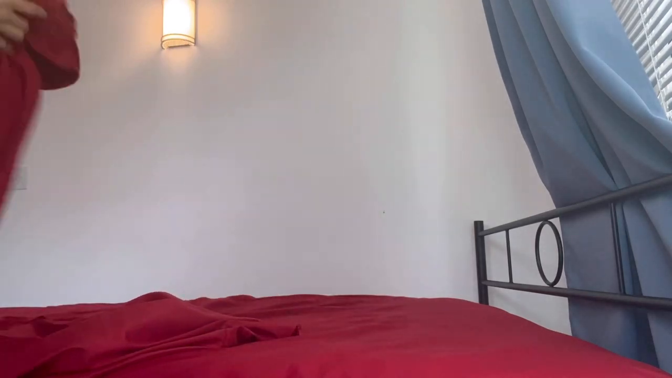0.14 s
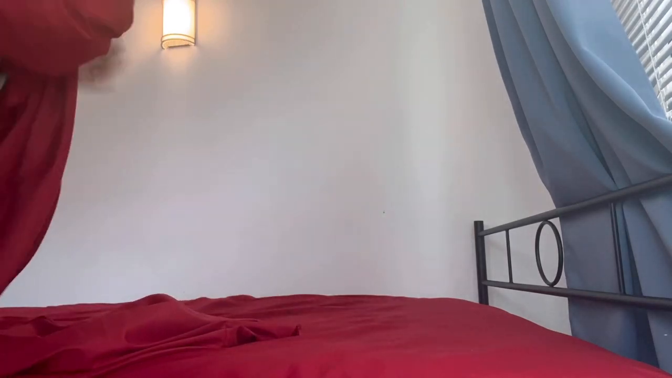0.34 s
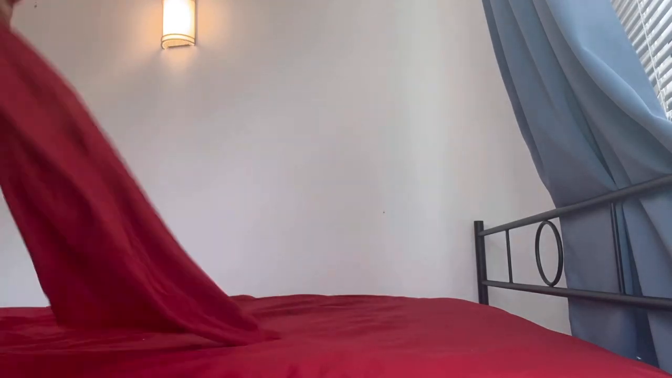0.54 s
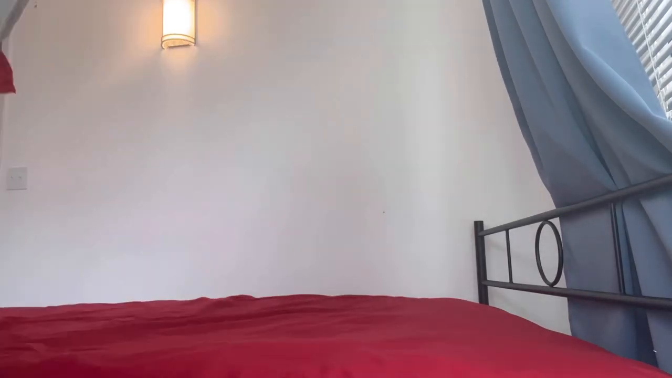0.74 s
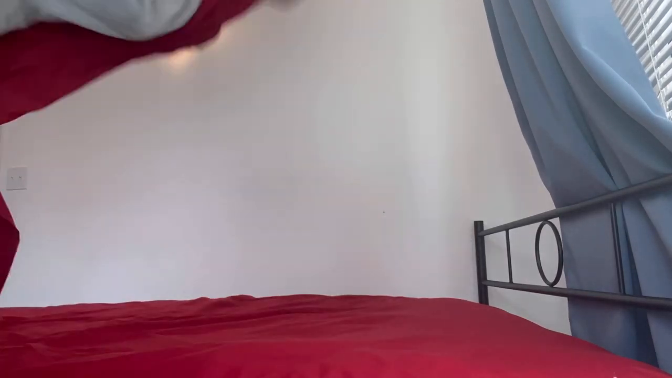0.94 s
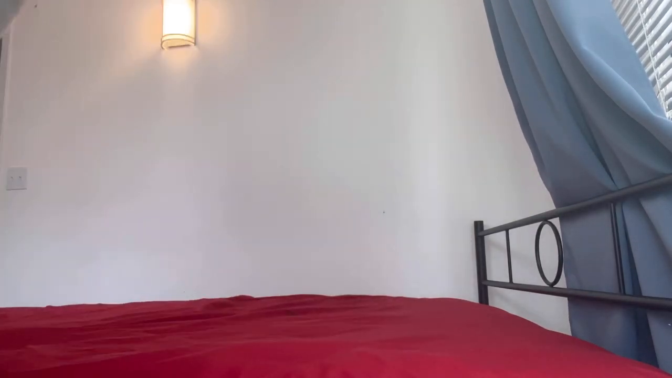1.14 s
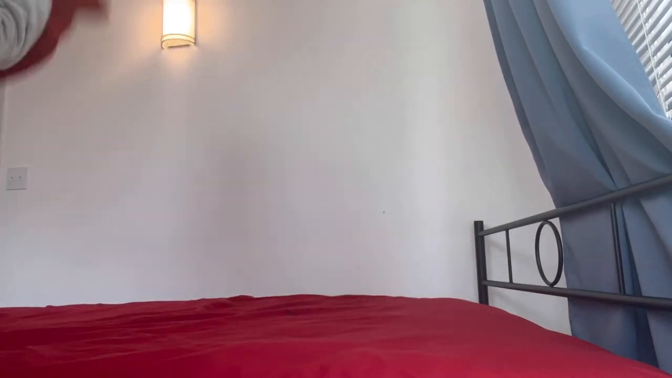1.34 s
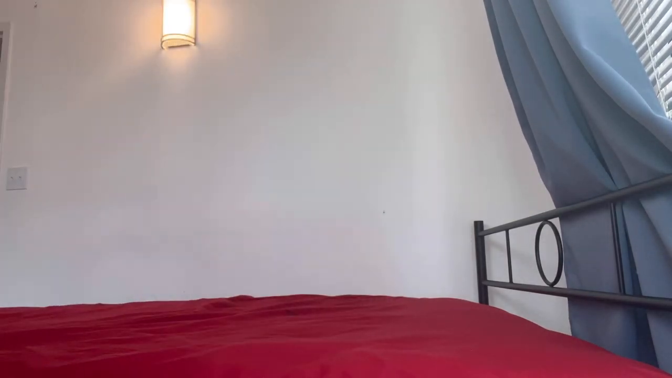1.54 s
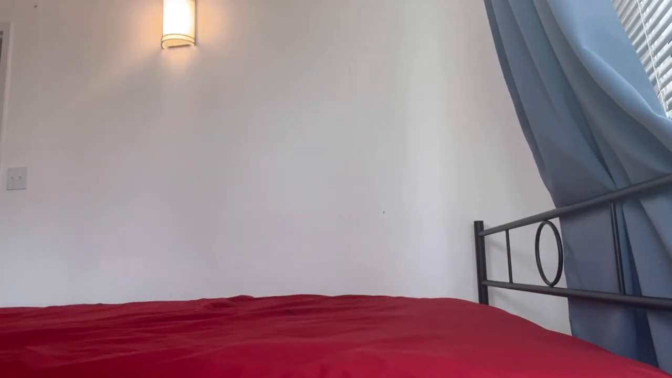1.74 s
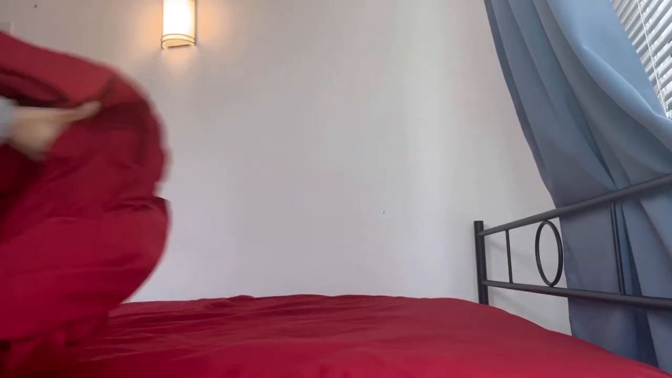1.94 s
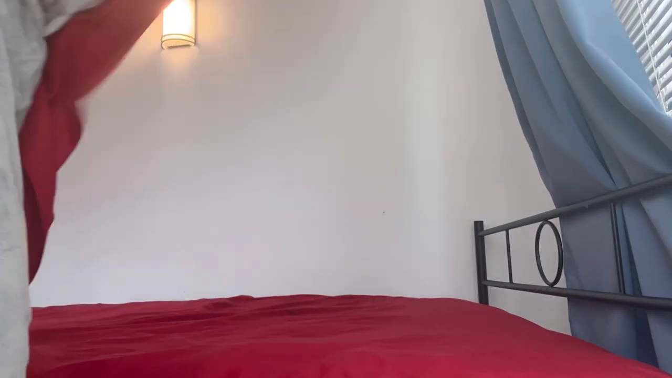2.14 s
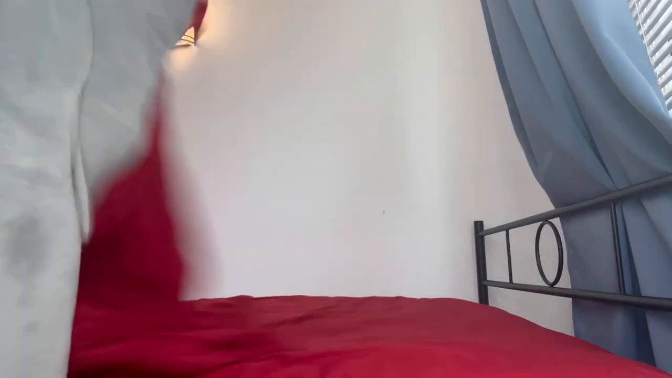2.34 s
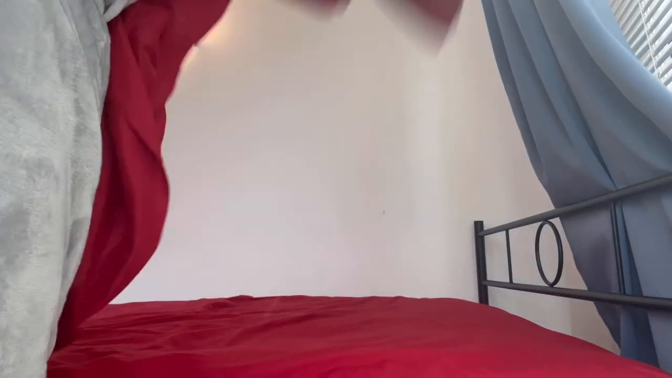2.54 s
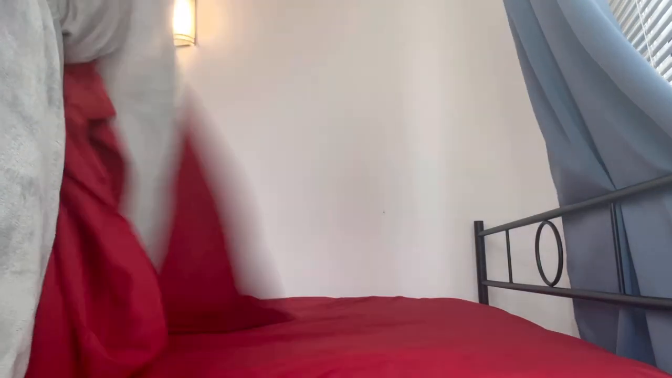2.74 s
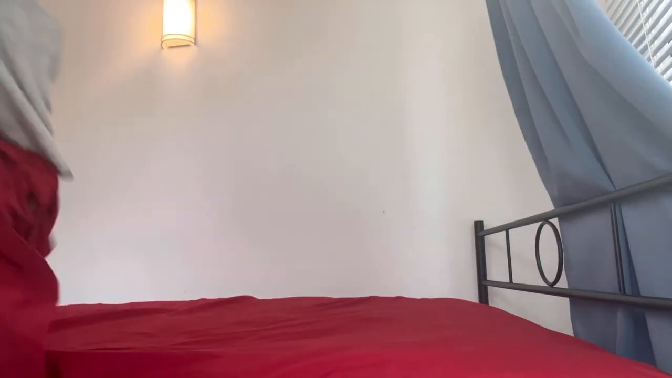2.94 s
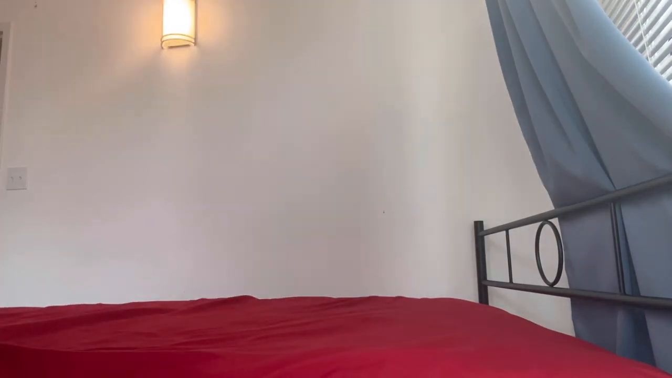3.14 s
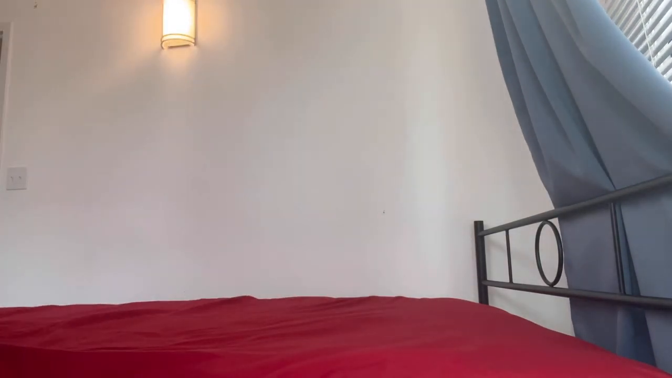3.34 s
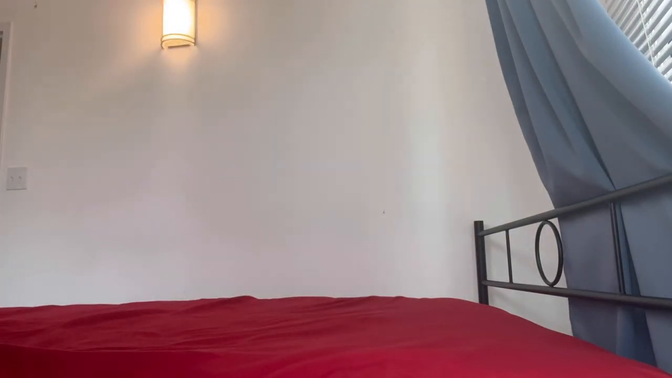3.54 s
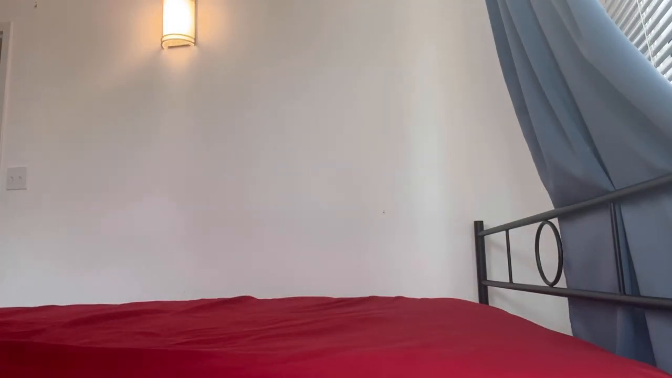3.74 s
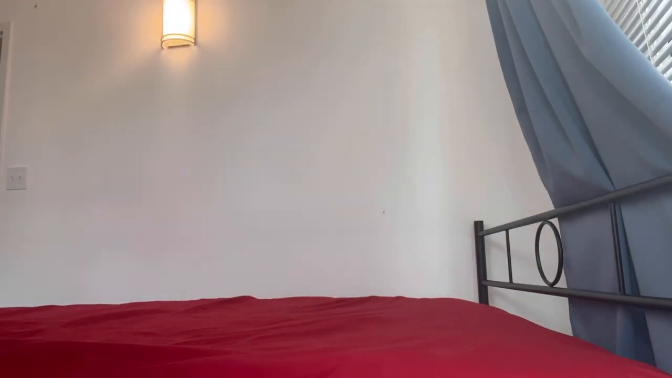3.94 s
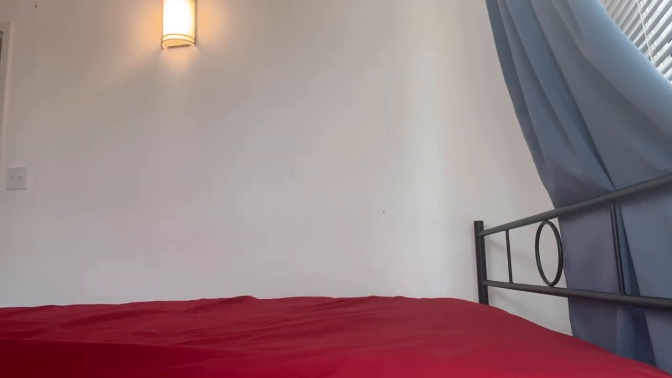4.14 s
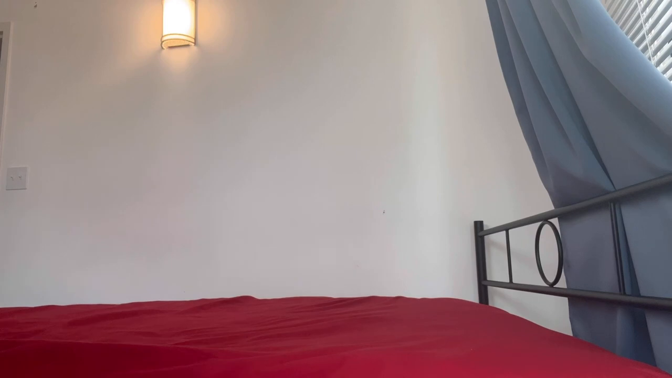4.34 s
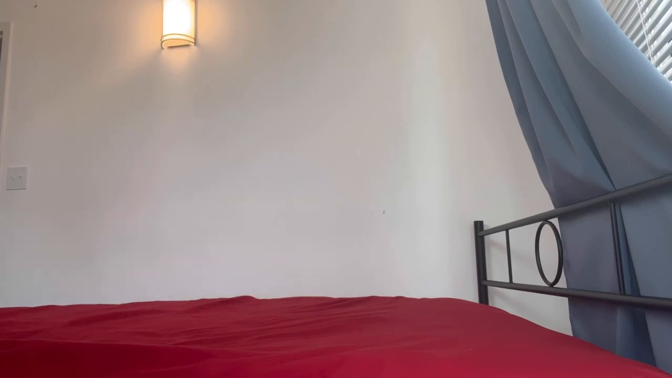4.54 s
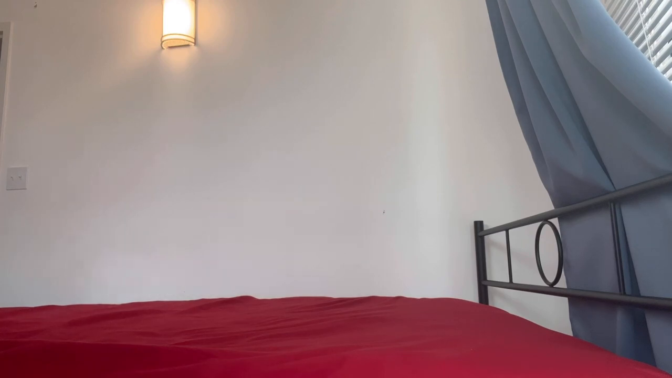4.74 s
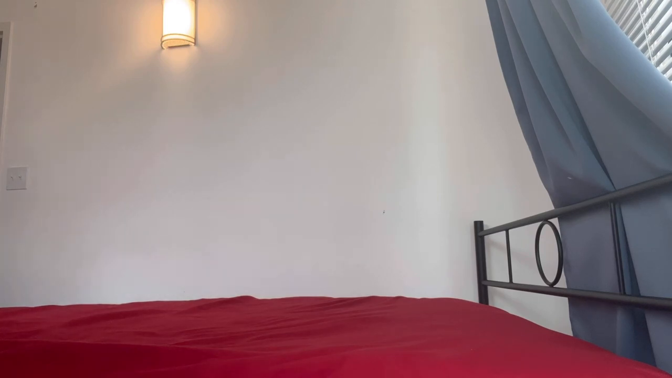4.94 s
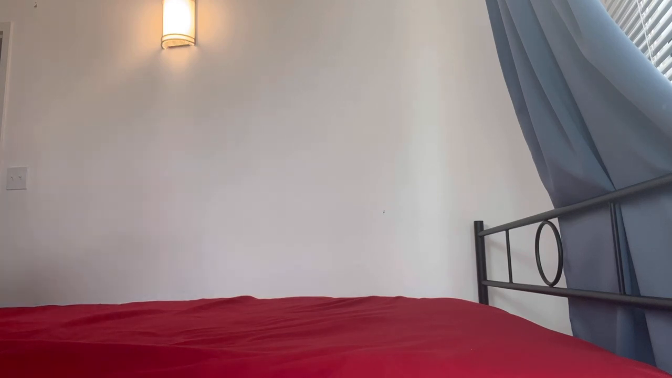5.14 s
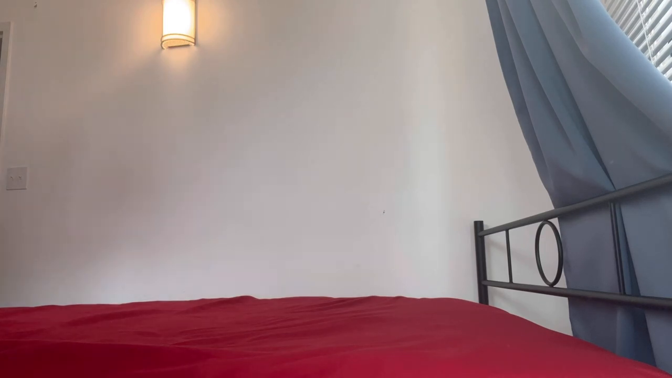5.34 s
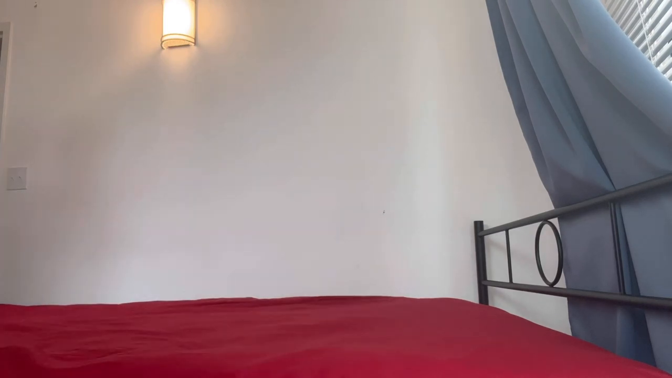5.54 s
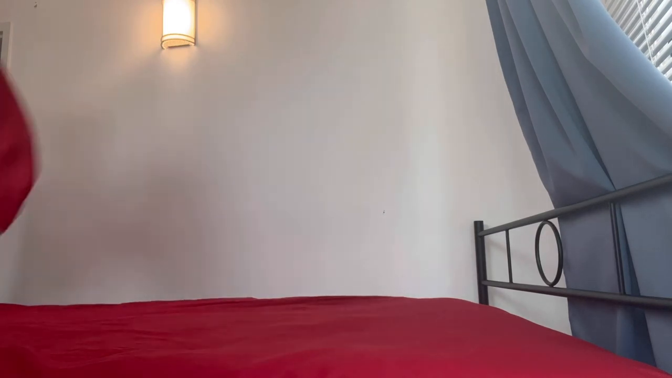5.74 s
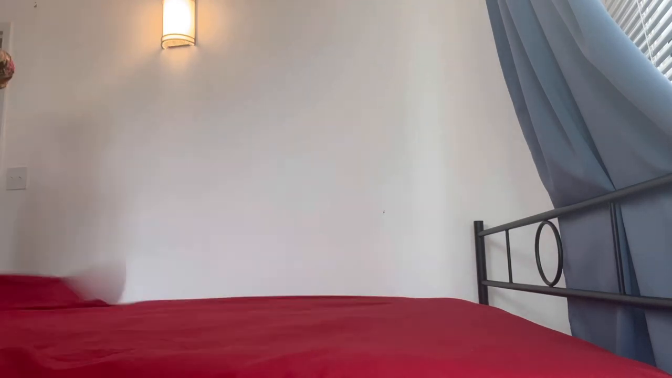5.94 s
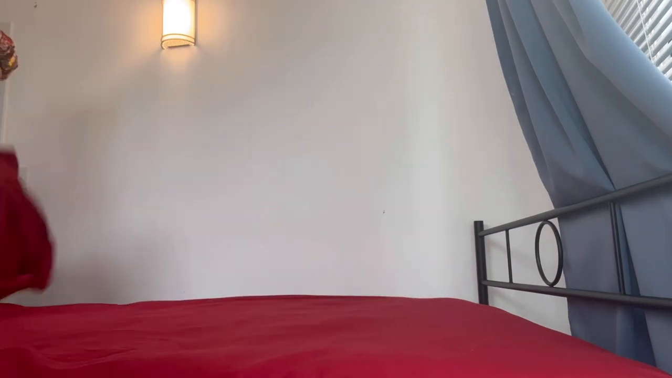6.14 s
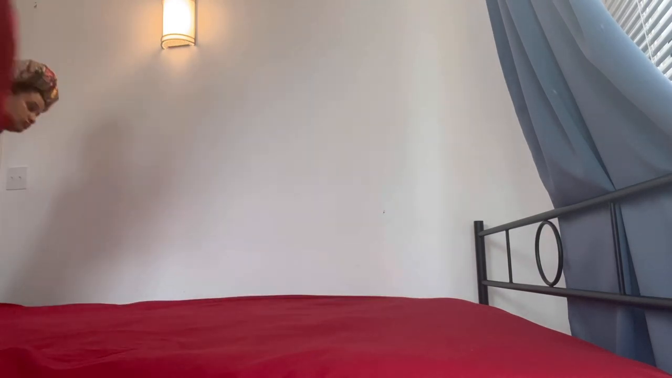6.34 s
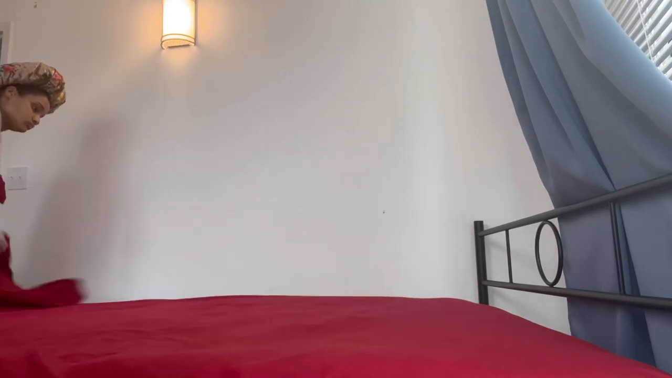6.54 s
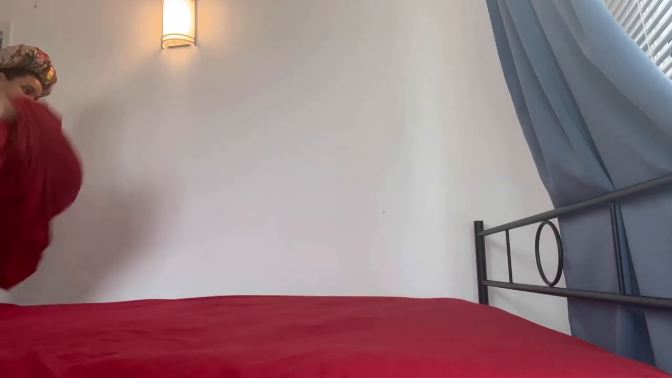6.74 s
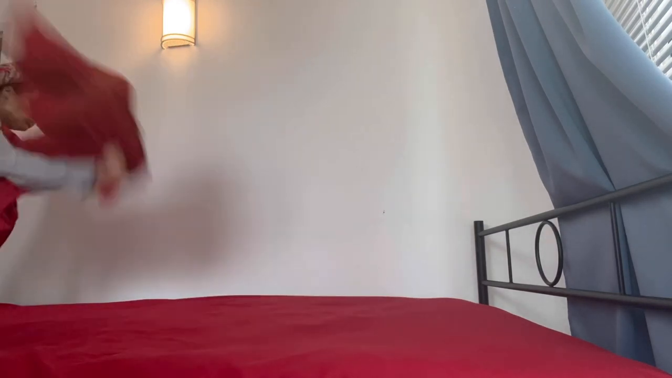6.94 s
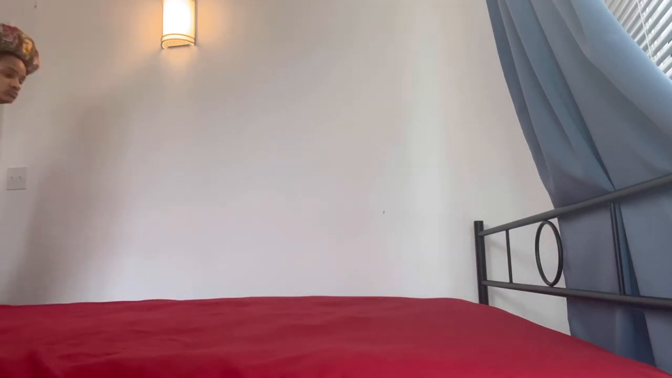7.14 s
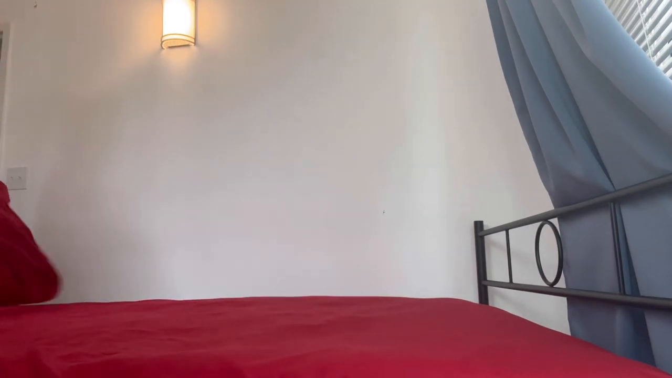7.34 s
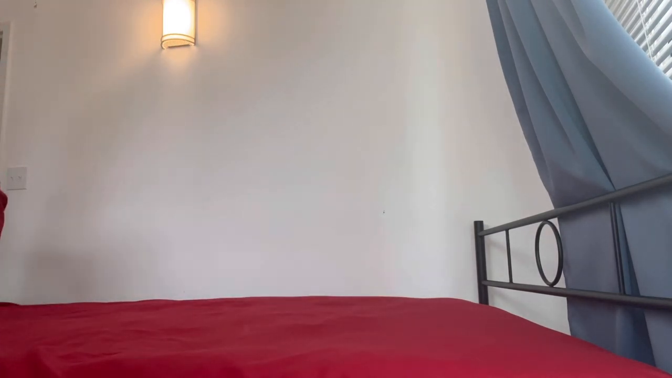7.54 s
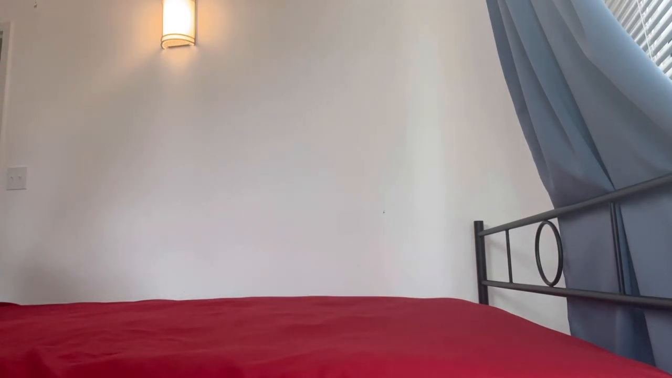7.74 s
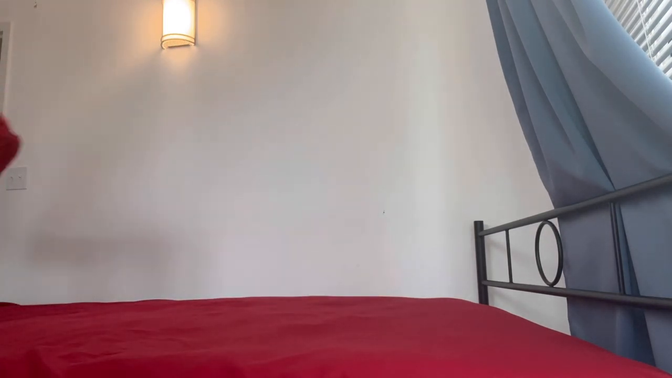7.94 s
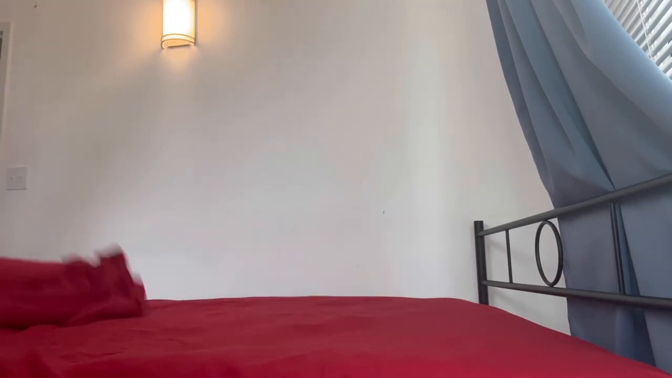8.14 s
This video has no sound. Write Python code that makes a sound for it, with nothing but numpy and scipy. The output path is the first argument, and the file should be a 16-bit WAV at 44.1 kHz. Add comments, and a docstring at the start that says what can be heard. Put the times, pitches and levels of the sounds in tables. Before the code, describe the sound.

A quiet bedroom with a faint low rumble, heard close in stereo by a phone. Soft cloth rustles and tiny taps begin, then a sharp flap of bedding at 0.7 s, with a deep push of air and a short echo. More flaps follow at 1.1 and 1.5 s, duller and looser; a barely audible squeak slides down near 1.75 s. After swishing fabric, crisp, hollow snaps hit at 2.35, 2.75 and 3.3 s. From 3.5 to 5.4 s there is only light handling: uneven rustles, dry ticks, little pops, with very faint peeps around 3.6 s. Four heavy flaps then land at 5.5, 6.0, 6.5 and 7.0 s, each a boomy whump with a fluttering tail and brisk swishes between. A low, steady motor hum enters around 7.1 s under fading soft rustles and a last small tap at 8.2 s.

```python
"""A softly rumbling house and rustling bedding, then ten loud flaps as the bedding is shaken out in a bedroom.
Each flap is three bands of lumpy noise that burst as the cloth snaps taut, with low swings of pushed air.
Between flaps, swells of noise make the rustle, and short bursts and ringing tones the taps, ticks and pops.
A faint squeak and peeps are plain tones; a motor hum of three low tones sets in near the end.
The room gives the sharp sounds a short echo, and a phone's two microphone ports hear it all in stereo."""
import sys
import numpy as np
from scipy import signal
from scipy.fft import rfft, irfft, next_fast_len
from scipy.io import wavfile
from scipy.ndimage import uniform_filter1d, map_coordinates

SR = 44100
rng = np.random.default_rng(int(sys.argv[2]) if len(sys.argv) > 2 else 0)


def store_pcm(level_fs):
    """Save levels as 16-bit WAV."""
    pcm = np.round(np.clip(level_fs, -1, 1) * 32767).astype(np.int16)
    wavfile.write(sys.argv[1], SR, np.atleast_2d(pcm).T)


N = 365132  # length [samples]

# snaps of the sheet: (time [s], middle-band level before the crack [dB], body above middle [dB],
# treble above middle [dB], gust above middle [dB], left above right [dB], base rise [dB/ms],
# base hold [ms], fall [dB/ms])
FLAP_ROWS = [(.702, -23, 2, -13, 0, 0, 2, 14, 0.9), (1.12, -28.5, 2.5, -14, 5, 0.5, 4.5, 21, .5),
             (1.540, -25.5, 2.5, -19, 0, -2, 1.5, 11, 0.65), (2.345, -22, 5, -16.5, -3, 0, 1, 17.4, 3),
             (2.765, -18, -5.5, -10, -10.5, 0, 2.5, 18.2, 1.5),
             (3.327, -19.5, 2, -16.5, -2, -0.5, 2, 15, 0.55),
             (5.480, -22.5, 1.5, -15.5, 2, 0, 1.5, 20, .44), (5.969, -21.5, -0.5, -12, 1, 0, 1.5, 20, 0.55),
             (6.486, -23.5, -1, -11, -2, -.5, 1.6, 18.3, .5), (7.030, -21, -2, -16.5, 2, -2, 1.4, 7.9, 0.7)]
# colour of the low body of a burst: (frequency [Hz], relative level [dB])
BODY_COLOUR = [(71, -2.5), (120, -0.5), (290, -5.5), (408, -4.5), (500, -22.5), (650, -6.5), (1100, -120)]
# colour of rubbed fibres: (frequency [Hz], relative level [dB])
HISS_COLOUR = [(2940, -29), (5000, -1.5), (7490, -3.5), (8620, -4), (9830, -9.5), (14000, -4.5),
               (16000, -24)]


def amp(db):
    """Turns a level in dB into a gain."""
    return 10 ** (np.asarray(db) / 20)


def unit(x):
    """Scales x to an rms of 1."""
    return x / np.sqrt(np.mean(x ** 2) + 1e-20)


def along(points, hz):
    """Reads a curve of (frequency [Hz], value) points on a log frequency axis."""
    f, v = np.transpose(points)
    return np.interp(np.log(hz + 1), np.log(f + 1), v)


def curves(rows):
    """Gives one value per sample for each column after the time."""
    s, *cols = np.transpose(rows)
    return [np.interp(np.arange(N) / SR, s, c) for c in cols]


def wobble(rate):
    """Draws a smooth random curve through rate random points a second."""
    knots = rng.standard_normal(int(N * rate / SR) + 4)
    return map_coordinates(knots, [np.arange(N) * rate / SR])


def filtered(x, response):
    """Multiplies the spectrum of x by a response that depends on frequency."""
    m = next_fast_len(N + SR // 2)
    return irfft(rfft(x, m) * response(np.fft.rfftfreq(m, 1 / SR)), m)[..., :N]


def ports(hz):
    """Splits a source between the two ports, by level and phase at each frequency."""
    # level difference: (frequency [Hz], left above right [dB])
    lean_points = [(60, -2), (130, -6.5), (300, 0), (600, -2.5), (4000, 0), (12000, -0.5)]
    # phase difference: (frequency [Hz], lead of left over right [radians])
    lead_points = [(0, 0), (90, 0.03), (170, .6), (400, -.5), (860, -3), (1400, 2), (3500, 1), (4700, -2),
                   (8000, -2), (16000, -1.5)]
    lean = np.log(amp(along(lean_points, hz)))
    lead = np.interp(hz, *np.transpose(lead_points))
    turn = lean + 1j * lead
    return np.exp(np.array([turn, -turn]) / 2)


def cloth(spectrum, grain, patchy_db=0):
    """Makes coloured stereo noise of rms 1, lumped in time by grain and in patches of time and pitch."""
    # likeness of the two ports: (frequency [Hz], shared part of the power [0-1])
    alike_points = [(60, .99), (130, .96), (300, 0.66), (1000, 0.36), (5000, 0.54), (9000, .7)]
    z = signal.stft(grain * rng.standard_normal((3, N)), nperseg=256)[2]
    patches = uniform_filter1d(rng.standard_normal(z.shape[1:]), size=7, axis=0)
    patches = uniform_filter1d(patches, size=12, axis=1)
    noises = signal.istft(z * amp(patchy_db * unit(patches)), nperseg=256)[1][:, :N]
    near, apart = noises[0], noises[1:]  # one noise on both ports, and one more on each

    def share(hz):
        return np.clip(along(alike_points, hz), 0, 1)

    def colour(hz):
        return amp(along(spectrum, hz))

    shared = filtered(near, lambda hz: colour(hz) * np.sqrt(share(hz)) * ports(hz))
    scattered = filtered(apart, lambda hz: colour(hz) * np.sqrt(1 - share(hz)))
    return unit(shared + scattered)


def add(track, s, shape):
    """Adds shape to the track from time s on."""
    part = track[..., max(round(s * SR), 0):][..., :shape.shape[-1]]
    part += shape[..., :part.shape[-1]]


def house():
    """Noise rumbles through the walls, low tones make a motor's hum, and still air hisses."""
    # rumble: (time [s], level [dB])
    rumble_levels = [(0.0, -51), (0.8, -55), (1.96, -52.5), (2.49, -50), (3.62, -53.5), (5.3, -52.5),
                     (6.11, -45.5), (7.91, -53.5), (8.28, -49)]
    # hum: (time [s], level before each tone's own [dB])
    hum_levels = [(7.0, -93), (7.15, -52.5), (8.28, -51)]
    # tones of the motor: (frequency [Hz], level within the hum, before it wavers [dB])
    motor_tones = [(88, -0.5), (175.5, -1.5), (264, -15.5)]
    # colour of the rumble: (frequency [Hz], relative level [dB])
    rumble_colour = [(13, -39), (22, -4.5), (65, -3.5), (78, -1.5), (97, -10), (120, -11), (160, -27),
                     (260, -120)]
    # colour of still air: (frequency [Hz], relative level [dB])
    air_colour = [(290, -9.5), (500, -2), (919, -15.5), (1820, -11), (3540, -22.5), (6610, -19.5),
                  (9630, -37), (11500, -29), (13600, -20), (14200, -11), (14700, -21), (16000, -25)]
    air_db = -70.5
    rumble = amp(curves(rumble_levels)[0]) * cloth(rumble_colour, amp(0.5 * wobble(7.4)))
    t, hum = np.arange(N) / SR, np.zeros(N)
    for hz, db in motor_tones:
        hum += amp(db + .7 * wobble(6.5)) * np.sin(2 * np.pi * hz * t + .15 * wobble(6.3))
    hum = filtered(amp(curves(hum_levels)[0]) * hum, ports)
    air = amp(air_db) * cloth(air_colour, amp(2.1 * wobble(6.4)), patchy_db=1.5)
    return rumble + hum + air


def strokes():
    """Sets the strength of rustle, hiss and stir: strokes swell and trail off over the handled bedding."""
    # bedding handled between strokes: (time [s], rustle level before it wavers [dB])
    held_levels = [(0.0, -70), (2.0, -72.5), (2.24, -62), (2.79, -69.5), (3.41, -64.5), (3.55, -75),
                   (5.0, -74), (6.62, -66), (6.73, -76.5), (7.12, -60), (7.24, -74.5), (8.28, -79)]
    # cloth sliding over cloth: (start [s], length [s], rustle level at its peak [dB],
    # hiss above rustle [dB], low stir level at its peak [dB])
    swish_rows = [(0.002, .12, -64, -7, -47), (0.15, .07, -65, -5, -51.5), (0.391, 0.2, -58.5, -1.5, -49.5),
                  (0.87, 0.29, -70.5, -5, -57.5), (1.246, 0.062, -67, -11, -53),
                  (1.42, 0.23, -66, -5.5, -58), (1.632, 0.084, -63, -10, -48), (2.013, .07, -55.5, -8, -51),
                  (2.066, 0.22, -57, -0.5, -56.5), (2.146, 0.21, -57.5, -5, -59),
                  (2.403, 0.28, -60, -3, -53), (2.648, 0.099, -57, -1.5, -49.5),
                  (2.945, 0.094, -61, 0.5, -72), (3.098, .05, -55, -2, -51), (3.221, .14, -56.5, 0, -41),
                  (3.43, 0.094, -61.5, -10, -49), (3.497, 0.124, -64, -3.5, -62),
                  (3.753, 0.083, -70.5, 5.5, -70), (3.869, 0.084, -63.5, -7, -55),
                  (3.929, 0.154, -67, -1, -56), (4.079, .16, -63, -5, -54.5), (4.257, 0.11, -68, -8, -49),
                  (4.332, 0.088, -56.5, -2, -65), (4.434, 0.083, -53.5, -3, -47), (4.5, 0.047, -69, 6, -52),
                  (4.545, 0.11, -67.5, 4.5, -51.5), (4.704, .13, -63.5, -4, -52.5),
                  (4.835, 0.084, -65.5, -2, -59), (4.986, 0.058, -62.5, -4, -54),
                  (5.032, 0.091, -61.5, -2, -57), (5.101, 0.116, -68.5, -2.5, -54.5),
                  (5.29, 0.23, -64.5, -5, -52.5), (5.395, 0.08, -66.5, 5, -52.5),
                  (5.616, .12, -62, -0.5, -49), (5.78, 0.17, -59, -4, -48.5),
                  (6.196, 0.12, -68.5, -22, -47), (6.325, 0.17, -59, -6.5, -52),
                  (6.582, 0.108, -52, -10, -36.5), (6.639, .14, -60, -1, -46),
                  (6.896, 0.17, -54, -3.5, -37.5), (7.053, 0.21, -60, -6, -47.5),
                  (7.254, 0.08, -65.5, -7, -60), (7.48, 0.16, -66.5, -10, -58),
                  (7.598, 0.22, -66.5, -7, -56.5), (7.87, .24, -79, -21, -63), (7.773, 0.054, -67, -5, -69),
                  (8.136, 0.1, -65, -9, -49)]
    held_hiss_db, held_stir_db = -5.5, 13  # above the handled rustle
    peak_at, edge_db = .35, 12.5  # share of a stroke spent speeding up; drop at its two ends

    def gains(rustle_db, hiss_db, stir_db):
        return amp([rustle_db, rustle_db + hiss_db, stir_db])

    held_db, = curves(held_levels)
    waver = amp(2.3 * np.array([wobble(6) for _ in range(3)]))
    power = (gains(held_db, held_hiss_db, held_db + held_stir_db) * waver) ** 2
    t = np.arange(N) / SR
    for s, length, *levels in swish_rows:
        # a stroke trails on beyond its two ends
        near = slice(max(round((s - length) * SR), 0), round((s + 2 * length) * SR))
        u = (t[near] - s) / length - peak_at
        away = np.maximum(-u / peak_at, u / (1 - peak_at))  # 0 at the peak, 1 at either end
        swell = amp(-edge_db * away ** 1.5)
        power[:, near] += (gains(*levels)[:, None] * swell) ** 2
    return np.sqrt(power)


def rustle():
    """Sliding fibres hiss and rustle in uneven swells, and the mass of the bedding stirs low."""
    # colour of the rustle: (frequency [Hz], relative level [dB])
    rustle_colour = [(470, -23), (800, 8.5), (918, -3.5), (1020, -7.5), (1360, 0.5), (5000, -9.5),
                     (6500, -50.5), (11000, -120)]
    # colour of the low stir: (frequency [Hz], relative level [dB])
    stir_colour = [(71, -28), (120, -3), (180, -2.5), (400, -10), (650, -15.5), (950, -26), (1800, -120)]
    rubbing, hiss, stir = strokes()
    slips = 1.4 * wobble(22) + 1.1 * wobble(150)  # unevenness that all three have in common [dB]
    rubbing = rubbing * cloth(rustle_colour, amp(slips + 0.99 * wobble(500)), patchy_db=3.5)
    hiss = hiss * cloth(HISS_COLOUR, amp(slips + 1.7 * wobble(350)), patchy_db=1.0)
    stir = stir * cloth(stir_colour, amp(.9 * slips + 2.5 * wobble(22)), patchy_db=2.5)
    return rubbing + hiss + stir


def bursts(rows, colours):
    """Air and creases burst out of the folds, in a low, a middle and a treble band of noise."""
    strength = np.zeros((3, 2, N))  # band, port, sample
    before = SR // 20
    ms = np.arange(-before, SR // 4) / SR * 1000
    early = np.minimum(ms, 0)
    for s, db, body_db, treble_db, pan_db, rise_db, hold_ms, fall_db in rows:
        # the sheet gathers speed, low sound first: a slow lead-in, then a steep rise
        steep = rise_db * np.array([[1], [1], [1.2]]) * early
        lead_in = np.array([[-16], [-22], [-24]]) + 0.38 * early
        rises = np.maximum(steep, lead_in)
        # folds keep slapping while it is taut, the finest stop first
        holds = hold_ms * np.array([[1.1], [.9], [.6]])
        fall = fall_db * np.maximum(ms - holds, 0)
        # the weave snaps tight
        crack = np.array([[0], [2.5], [4.5]]) * np.exp(-np.abs(ms - 1.5) / 3.3)
        levels = db + np.array([[body_db], [0], [treble_db]]) + rises - fall + crack
        shape = amp(levels)[:, None] * amp([[pan_db / 2], [-pan_db / 2]])
        cut = max(before - round(s * SR), 0)  # the part that would lie ahead of time 0
        add(strength, s - before / SR, shape[..., cut:])
    folds = 1.4 * wobble(130) + 2.38 * wobble(450)
    total = np.zeros((2, N))
    for level, colour in zip(strength, colours):
        total += level * cloth(colour, amp(folds + 1.7 * wobble(170)), patchy_db=2.0)
    return total


def taps():
    """Small folds slip: sudden, short, with the thinner colour of rubbed fibres."""
    # small taps of cloth and hands: (time [s], middle-band level before the crack [dB],
    # body above middle [dB], treble above middle [dB])
    tap_rows = [(0.038, -63, 4, -9), (.061, -55, 12, -17.5), (.094, -59, 1, -22), (0.168, -62.5, 12, -3),
                (0.792, -39.5, 12.5, -26.5), (1.014, -63.5, 13, -16), (1.27, -60.5, 9.5, -19),
                (1.662, -61, 7, -4.5), (2.013, -55, -9, -22.5), (2.976, -55, -25, -6),
                (3.101, -55.5, -16, -14.5), (3.244, -54, -3, -16), (3.459, -56, -4, -14),
                (3.529, -63.5, -9, -10.5), (3.88, -62, -4, -21), (4.093, -62, 13, -3.5),
                (4.189, -64.5, -1, -8), (4.349, -53, -13, -8.5), (4.452, -57, -24, -14),
                (4.547, -70, 8, 12.5), (4.57, -62.5, -9, 7.5), (4.593, -66, 2, -29), (4.78, -58, -6.5, -11),
                (5.044, -70, -8, 8), (5.461, -46, 4, -25), (5.639, -68.5, -11, 0), (6.212, -49, 1, -30),
                (6.61, -53.5, 10.5, -10.5), (6.675, -49, 3, -14), (6.901, -61.5, 15, -17),
                (7.017, -36, -1.5, -21.5), (8.181, -62.5, 11, -15.5)]
    # middle colour of small folds: (frequency [Hz], relative level [dB])
    slip_colour = [(450, -19), (800, 3), (1500, 1.5), (2500, -5), (4000, -13.5), (6000, -21.5), (9000, -39),
                   (13000, -120)]
    lean_db, rise_db, hold_ms, fall_db = -0.5, 8.5, 13, .9  # left above right; base rise/ms; base hold; fall/ms
    rows = [(*row, lean_db, rise_db, hold_ms, fall_db) for row in tap_rows]
    return bursts(rows, (BODY_COLOUR, slip_colour, HISS_COLOUR))


def knocks():
    """Air pockets in the bundle, under a hand or inside a flap, ring roughly for a few cycles, and one brief
    scrape rings high."""
    # hollow pops, and a high scrape at 4.451 s: (time [s], starting level before onset and roughness [dB],
    # pitch [Hz])
    pop_rows = [(.061, -46.5, 444), (.171, -41.5, 457), (1.130, -19, 169.5), (2.012, -35.5, 832),
                (2.349, -13.5, 388), (2.764, -10.5, 415), (2.774, -18, 392.5), (3.102, -36.5, 553),
                (3.331, -18.5, 477), (3.345, -15, 381), (3.461, -39, 432), (3.876, -47.5, 513),
                (4.451, -42, 2270), (4.469, -35.5, 658), (4.59, -35.5, 670), (4.745, -46, 564),
                (4.998, -51, 867), (5.482, -20.5, 190), (5.970, -12, 147.7), (6.210, -38, 426),
                (6.397, -38.5, 445), (6.486, -11, 150.8), (7.036, -19, 166.5), (8.175, -47, 428)]
    hollow, t = np.zeros(N), np.arange(SR // 8) / SR
    for s, db, hz in pop_rows:
        t60 = 0.062 * (400 / hz) ** 0.22  # time to die by 60 dB [s]: higher pops die sooner
        rough = 1 + 1.2 * uniform_filter1d(rng.standard_normal(len(t)), size=60)
        envelope = amp(db - 60 * t / t60) * (1 - np.exp(-t / 0.00053))
        add(hollow, s, envelope * rough * np.sin(2 * np.pi * hz * t))
    return filtered(hollow, ports)


def ticks():
    """Single threads and seams snap with dry bright clicks of fast-fading noise."""
    # snaps of threads: (time [s], starting level [dB])
    tick_rows = [(0.168, -42), (0.7045, -26), (1.2702, -58), (2.0123, -56), (2.3435, -22), (3.1004, -45),
                 (3.3272, -21), (4.505, -46), (4.544, -50), (4.5694, -37.5), (5.4786, -29)]
    t60 = 0.0085  # time to die by 60 dB [s]
    strength, t = np.zeros(N), np.arange(SR // 20) / SR
    for s, db in tick_rows:
        add(strength, s, amp(db - 60 * t / t60))
    return strength * cloth(HISS_COLOUR, 1)


def flaps():
    """The whole sheet snaps taut, bursting in body, snap and treble."""
    # colour of the middle snap: (frequency [Hz], relative level [dB])
    snap_colour = [(290, -10), (500, 0), (909, -7), (1160, -9), (2200, -13.5), (2830, -15.5), (5000, -26.5),
                   (6500, -24), (11000, -120)]
    # colour of the treble: (frequency [Hz], relative level [dB])
    treble_colour = [(2940, -29), (5000, -4.5), (7640, -8.5), (8750, -10.5), (9930, -14.5), (13600, -14),
                     (16000, -25.5)]
    rows = [(s, db, body, treble, *shape) for s, db, body, treble, _, *shape in FLAP_ROWS]
    return bursts(rows, (BODY_COLOUR, snap_colour, treble_colour))


def pushes():
    """The sheet shoves the room's air: low swings that start as suction, and a looser gust at each flap."""
    # shoves of air as the sheet turns: (time [s], starting level before onset [dB],
    # swing frequency [Hz], time to die by 60 dB [s])
    push_rows = [(0.695, -8, 71, 0.18), (1.12, -15.5, 81, 0.082), (1.534, -16.5, 74.8, 0.067),
                 (1.552, -24, 49.4, 0.22), (2.344, -19.5, 74.6, 0.069), (2.359, -10, 57.3, 0.17),
                 (2.758, -12, 84.4, 0.13), (2.789, -16.5, 72.2, 0.13), (3.330, -23.5, 74.5, 0.12),
                 (3.357, -23, 50.7, 0.17), (5.475, -6.5, 70.7, 0.12), (5.962, -5, 74.7, 0.12),
                 (6.485, -2.5, 69.8, 0.089), (7.03, -7, 72.2, 0.11)]
    # colour of the gust: (frequency [Hz], relative level [dB])
    gust_colour = [(10, -20), (22, -14.5), (40, -3), (70, -51), (200, -120)]
    swing, gust, t = np.zeros(N), np.zeros(N), np.arange(SR // 2) / SR
    for s, db, hz, t60 in push_rows:
        envelope = amp(db - 60 * t / t60) * (1 - np.exp(-t / .007))
        add(swing, s, -envelope * np.sin(2 * np.pi * hz * t))
    for s, db, _, _, gust_db, *_ in FLAP_ROWS:
        add(gust, s, amp(db + gust_db - 60 * t / 0.28) * (1 - np.exp(-t / 0.0055)))
    return filtered(swing, ports) + gust * cloth(gust_colour, 1)


def squeak():
    """A faint short squeak glides down in pitch with three overtones."""
    # path of the squeak: (time [s], pitch [Hz], level of its lowest tone before the fade [dB])
    squeak_path = [(1.715, 670, -73), (1.76, 620, -63.5), (1.81, 570, -68)]
    hz, db = curves(squeak_path)
    phase, t = 2 * np.pi * np.cumsum(hz) / SR, np.arange(N) / SR
    fade = np.clip(np.minimum(t - squeak_path[0][0], squeak_path[-1][0] - t) / 0.012, 0, 1)
    tone = np.sin(phase) + 0.62 * np.sin(2 * phase) + 0.23 * np.sin(3 * phase) + 0.11 * np.sin(4 * phase)
    return amp(db) * fade * tone


def peeps():
    """Short faint pure tones swell and fade."""
    # thin tones: (time [s], length [s], pitch [Hz], peak level ahead of the ports [dB])
    peep_rows = [(3.57, .073, 1870, -72), (3.64, 0.067, 1386, -71), (7.86, 0.047, 3150, -74),
                 (7.86, 0.065, 4690, -78)]
    tones = np.zeros(N)
    for s, length, hz, db in peep_rows:
        t = np.arange(round(length * SR)) / SR
        swell = np.sin(np.pi * t / length) ** .5
        add(tones, s, amp(db) * swell * np.sin(2 * np.pi * hz * t))
    return filtered(tones, ports)


def room(x):
    """The walls answer with a noise tail in which each frequency dies at its own speed."""
    # echo of the walls: (frequency [Hz], time to die by 60 dB [s])
    wall_points = [(60, 0.38), (160, 0.25), (420, 0.17), (1100, 0.16), (7700, 0.17)]
    hz, t, z = signal.stft(rng.standard_normal((2, SR // 2)), SR, nperseg=256)
    decay = amp(-60 * t / along(wall_points, hz)[:, None])
    tail = signal.istft(z * decay, SR, nperseg=256)[1]
    late = np.pad(x, ((0, 0), (300, 0)))  # the echo starts 300 samples later
    return signal.fftconvolve(late, tail / np.linalg.norm(tail[0]), axes=1)[:, :N]


def scene():
    """Flaps, taps, ticks and pops with their echo, plus moving air and cloth, faint tones and the house."""
    near = taps() + knocks() + ticks() + flaps()
    return house() + rustle() + near + amp(-11) * room(near) + pushes() + squeak() + peeps()


def record(dry):
    """The phone keeps nothing above its band limit."""
    top_hz = 15950
    return filtered(dry, lambda hz: hz < top_hz)


dry = scene()
out = record(dry)
store_pcm(out)
```